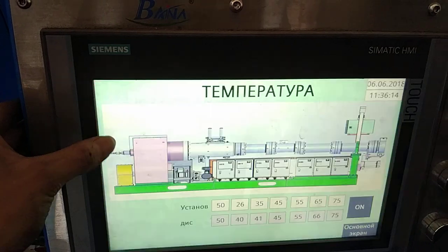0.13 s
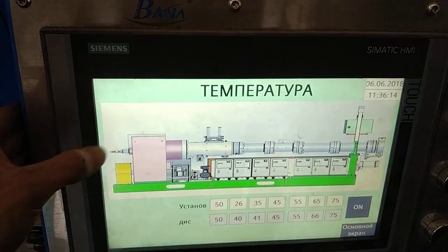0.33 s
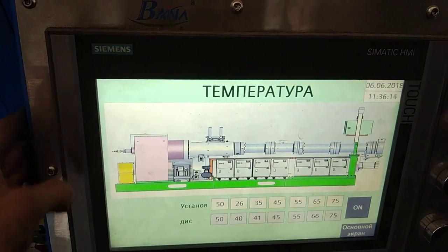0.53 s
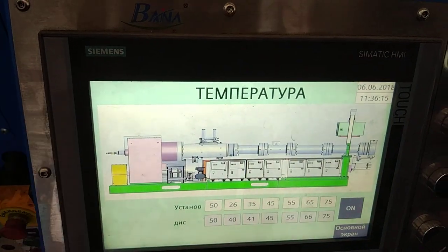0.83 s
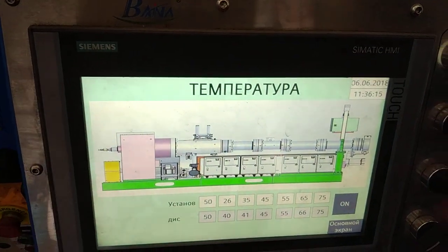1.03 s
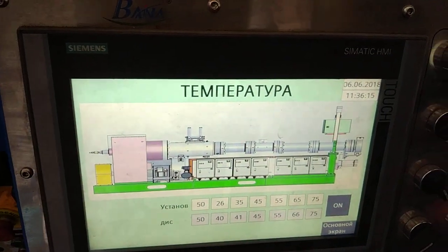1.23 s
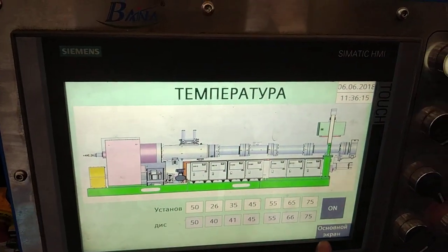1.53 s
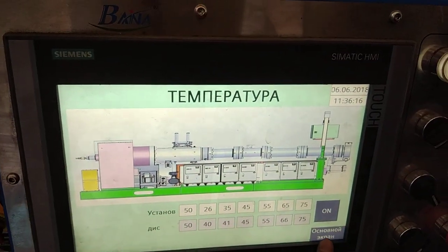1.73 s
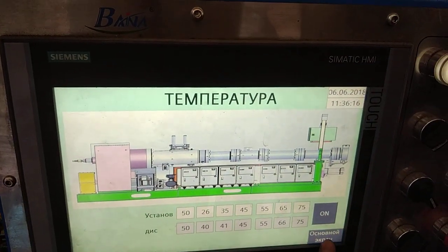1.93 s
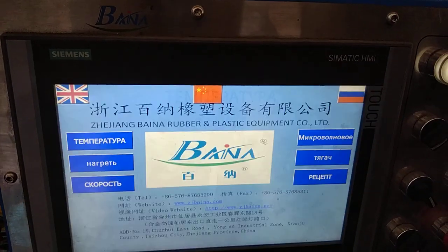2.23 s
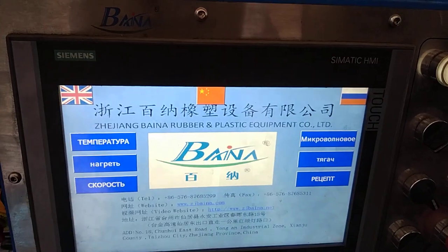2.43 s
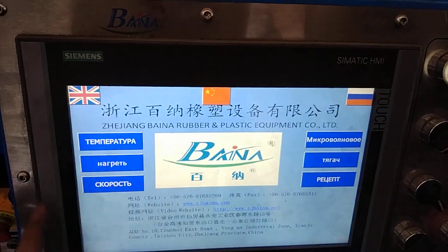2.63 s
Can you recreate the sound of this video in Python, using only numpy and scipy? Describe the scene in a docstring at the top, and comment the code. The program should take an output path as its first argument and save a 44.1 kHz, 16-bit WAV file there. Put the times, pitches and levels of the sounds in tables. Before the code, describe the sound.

Loud factory machinery drone, rushing fans and whining motor, with a few faint rattling clicks nearby

```python
"""A factory hall: fans and blowers rush and rumble, shafts and gears hum, a motor drive whines.
The rush is noise shaped over frequency; hums and gear tones are sines that waver, and two close
fan tones beat. The whine sits at multiples of a switching tone and their sidebands. Near the two
microphones something small rattles four times: bursts of noisy contacts ring a bright body."""
import sys
import numpy as np
from scipy import signal
from scipy.fft import rfft, irfft
from scipy.io import wavfile
from scipy.ndimage import uniform_filter1d

SR = 44100
rng = np.random.default_rng(int(sys.argv[2]) if len(sys.argv) > 2 else 0)


def wav_record(signal):
    """Record a signal, one row per channel, as 16-bit PCM in the file named by sys.argv[1]."""
    frames = np.transpose(np.atleast_2d(signal))
    bounded = np.clip(frames, -1, 1)
    # unit amplitude maps onto the largest positive 16-bit level
    quanta = np.round(bounded * 32767).astype(np.int16)
    wavfile.write(sys.argv[1], SR, quanta)


def natural_amplitude(level_db):
    """Convert a level in decibels to a linear amplitude factor, elementwise."""
    exponent = np.asarray(level_db, float) / 20
    return 10 ** exponent


N = 122598  # samples

# wander of the fan and shaft tones: level in dB rms, phase in rad rms, fastest rate in Hz
HUM_WAVER_DB, HUM_DRIFT_RAD, HUM_WAVER_HZ = 2, 0.6, 4


def evened(x):
    """Scales to rms 1."""
    return x / np.sqrt(np.mean(x ** 2) + 1e-20)


def read(point_hz, value, hz):
    """Joins points by straight lines on a log-frequency axis."""
    return np.interp(np.log(hz + 1), np.log(point_hz + 1), value)


def slow(t, top_hz, count=16):
    """A slow wander of rms 1: sines of random phase up to top_hz, the slower ones stronger."""
    rates = np.geomspace(top_hz / 12, top_hz, count)[:, None]
    sines = np.sin(2 * np.pi * (rates * t + rng.random((count, 1))))
    return evened((sines / np.sqrt(rates)).sum(0))


def rush():
    """Fans and machines as random short-time spectra, with faint patches, a swell and treble flicker."""
    # Spectrum of the rush. Each row: frequency in Hz, left level in dB per Hz, right level in dB per Hz.
    rush_spectrum = [(40, -95, -93.8), (70, -89, -84), (95.5, -75.5, -73), (132.5, -68, -67),
                     (148, -57.5, -59), (194, -44.5, -43.5), (245, -43.5, -42), (285, -48, -46),
                     (303, -44, -43.5), (325, -46.5, -47), (333, -50, -50.5), (474, -49, -46),
                     (530, -46.5, -49.5), (636, -54.5, -53.5), (930, -55, -55.5), (1130, -54.5, -56),
                     (1430, -56.5, -61), (1600, -56.5, -59), (1870, -52.5, -60.5), (2420, -54.5, -60),
                     (3060, -58.5, -63), (3630, -61, -65), (4480, -61, -66.5), (5140, -63.5, -69.5),
                     (6500, -64.5, -69.5), (7360, -66.5, -71.5), (8050, -65.5, -69), (8760, -69, -76.5),
                     (10000, -70.5, -79.5), (10600, -73.5, -95), (11900, -78, -102), (12700, -84.5, -104),
                     (13600, -80, -109), (14200, -82, -100), (14900, -85, -104), (15600, -97, -115)]
    # How alike the microphones hear it. Each row: frequency in Hz, left-right correlation from -1 to 1.
    likeness = [(60, 0.74), (120, 1), (240, 0.94), (480, 0.95), (950, 0.34), (1890, -0.24), (3770, 0.11),
                (7520, -0.061), (15000, -0.31)]
    swell_db, patchy_db, flicker_db, flicker_from_hz = 0.2, 0.8, 1.0, 8000  # depths in dB rms

    count, hz = N // 512 + 5, np.fft.rfftfreq(2048, 1 / SR)
    t = np.arange(count) * 512 / SR
    left_re, left_im, other_re, other_im, patches = rng.standard_normal((count, 1025, 5)).T
    patches = uniform_filter1d(patches, size=20, axis=0)  # across frequency
    patches = evened(uniform_filter1d(patches, size=6, axis=1))  # across time
    treble = (hz ** 2 / (hz ** 2 + flicker_from_hz ** 2))[:, None]
    swell = swell_db * slow(t, 2.73)
    flicker = flicker_db * treble * slow(t, 14)

    same = np.clip(read(*np.transpose(likeness), hz), -1, 1)[:, None]
    left = left_re + 1j * left_im
    right = same * left + np.sqrt(1 - same ** 2) * (other_re + 1j * other_im)
    spectra = np.array([left, right]) * natural_amplitude(patchy_db * patches + swell + flicker)
    # the unshaped noise sets the scale, so that the spectrum reads in dB per Hz
    scale = np.sqrt(SR / 2) / np.std(signal.istft(spectra, nperseg=2048, noverlap=1536)[1])
    point_hz, left_db, right_db = np.transpose(rush_spectrum)
    shape_db = np.array([read(point_hz, left_db, hz), read(point_hz, right_db, hz)])
    spectra *= natural_amplitude(shape_db)[:, :, None]
    return scale * signal.istft(spectra, nperseg=2048, noverlap=1536)[1][:, :N]


def tones(rows, waver_db, drift_rad, waver_hz):
    """Sines of fixed pitch: phase wanders alike at both microphones, level separately at each."""
    # Swell and fade of the high whine, left only. Each row: time in seconds, level change in dB.
    high_whine_left = [(0, -14), (.6, -14), (.7, 2), (1.1, 6), (1.35, 3), (1.5, -8), (2.4, -8), (2.78, -3)]
    swell_from_hz, swell_to_hz = 7700, 8000

    t, coarse, out = np.arange(N) / SR, np.arange(0, N + 256, 256) / SR, np.zeros((2, N))
    for hz, left_db, right_db, *more in rows:
        # if none is given, the left lead is random, in a range that widens up to 1500 Hz
        random_lead = np.clip(hz / 1500, 0, 1) ** 2 * 2 * np.pi * rng.random()
        lead, slope = more or (random_lead, 0)
        left_db = left_db + slope * (coarse - N / SR / 2)
        if swell_from_hz < hz < swell_to_hz:
            left_db = left_db + np.interp(coarse, *np.transpose(high_whine_left))
        drift = np.interp(t, coarse, drift_rad * slow(coarse, waver_hz))
        phase = 2 * np.pi * (hz * t + rng.random()) + drift
        for ear, (db, turn) in enumerate([(left_db, lead), (right_db, 0)]):
            level = natural_amplitude(np.interp(t, coarse, db + waver_db * slow(coarse, waver_hz)))
            out[ear] += np.sqrt(2) * level * np.sin(phase + turn)
    return out


def hums():
    """Fan blades and shafts hum at fixed pitches with a gentle waver."""
    # Tones of blades and shafts. Each row: frequency in Hz, left level in dB rms, right level in dB rms.
    hum_tones = [(285.6, -33, -31.9), (290.7, -39, -39), (301, -40, -38), (313.8, -36, -28),
                 (317.7, -39, -40), (491.0, -39.5, -40), (758.1, -42, -42), (826.4, -52, -40)]
    return tones(hum_tones, HUM_WAVER_DB, HUM_DRIFT_RAD, HUM_WAVER_HZ)


def fan_pair():
    """Two fans at nearly the same speed: close tones sharing one phase wander throb together."""
    # The two fan tones. Each row: frequency in Hz, left level in dB rms, right level in dB rms.
    pair_tones = [(832.37, -42, -39), (835.43, -39, -38)]
    beat_peak_s = 2.1  # the tones are in step here
    t = np.arange(N) / SR
    wander = 2 * np.pi * rng.random() + HUM_DRIFT_RAD * slow(t, HUM_WAVER_HZ)
    out = np.zeros((2, N))
    for hz, *ear_db in pair_tones:
        sine = np.sin(2 * np.pi * hz * (t - beat_peak_s) + wander)
        out += np.sqrt(2) * natural_amplitude(ear_db)[:, None] * sine
    return out


def gears():
    """Gears and bearings sing at many fixed, wavering pitches."""
    # Tones of gears and bearings, before any swell of the high whine.
    # Each row: frequency in Hz, left level in dB rms, right level in dB rms.
    gear_tones = [(2012, -45, -56), (2065.3, -39, -53), (2113.3, -40.5, -52), (2496.1, -41, -53),
                  (2654.2, -45.8, -61.7), (2990.2, -47.0, -63.6), (3025.8, -58.0, -50.9),
                  (3285.9, -49.0, -52.5), (3341.3, -48.8, -46.9), (3396.4, -45.9, -64.0),
                  (3424.6, -41.7, -53.3), (3722.2, -48.4, -59.5), (4245.1, -46.3, -50.4),
                  (4423.4, -48.3, -61.4), (4575.0, -47.3, -53.7), (6078.9, -65.5, -56.2),
                  (7793.7, -51, -56.2), (8312.0, -58.2, -61.5)]
    return tones(gear_tones, waver_db=2, drift_rad=1, waver_hz=2.17)


def drive():
    """Switching tone multiples with sidebands spaced by the motor current frequency."""
    # Where the drive sings. Each row: multiple of the switching tone, multiple of the motor
    # current frequency added to it (both plain numbers).
    orders = [(1, -5), (1, -3), (1, -1), (1, 1), (1, 5), (2, -2), (2, 0), (2, 2), (3, -1), (4, -1), (4, 1),
              (5, 0), (6, -2), (6, 2)]
    # How each order sounds, before any swell of the high whine. Each row: left level in dB rms
    # (at mid-scene), right level in dB rms, left phase lead in rad, left level drift in dB per second.
    whine = [(-50, -44.2, 0, 0), (-43.5, -53, 0, 0), (-33, -52, 2.4, 1.5), (-36.5, -49, .4, 0),
             (-37, -46, 2.8, 1), (-45, -45.5, 2.2, -6), (-48.1, -55.1, 0, 0), (-45, -48.3, -1.6, 2.5),
             (-51.0, -60.9, 0, 0), (-44.6, -49.5, -1.5, -1), (-52, -48.5, 1.6, -4), (-58.0, -76.1, 0, 0),
             (-64.8, -74.3, 0, 0), (-62.8, -72.3, 0, 0)]
    switch_hz, motor_hz = 1999.95, 26.35
    rows = [(m * switch_hz + k * motor_hz, *more) for (m, k), more in zip(orders, whine)]
    return tones(rows, waver_db=2, drift_rad=0.49, waver_hz=1.5)


def rattles():
    """Brief bursts of uneven contacts ring a small bright body, each a little differently, and die away."""
    # The rattles. Each row: start in seconds, level in dB, 60 dB decay time in seconds,
    # boost of modes under 9 kHz in dB, boost of modes over 11.5 kHz in dB.
    rattle_list = [(.96, -27.5, .11, 0, -2), (1.838, -22.5, .08, 4, 0), (1.908, -22.5, .13, -1, -10),
                   (2.166, -21, .12, 2, -3)]
    # Modes of the body. Each row: frequency in Hz, width in Hz, level in dB before boost and scatter.
    body_modes = [(6900, 1000, -2), (8600, 1500, -1), (10300, 1500, 0), (11900, 1000, -6),
                  (13800, 1400, -6), (15200, 800, -12)]
    rise_s, contacts_per_s, contact_db = 0.011, 2500, 15  # contacts stand out of a noise by contact_db
    right_down_db, scatter_db = 10, 2  # right is weaker; each mode varies by up to scatter_db

    t, hz, out = np.arange(8192) / SR, np.fft.rfftfreq(8192, 1 / SR), np.zeros((2, N + 8192))
    for start_s, db, t60, low_db, top_db in rattle_list:
        body = 0
        for mode_hz, width_hz, mode_db in body_modes:
            boost = low_db * (mode_hz < 9000) + top_db * (mode_hz > 11500)
            scatter = scatter_db * rng.uniform(-1, 1)
            resonance = 1 / (1 + 2j * (hz - mode_hz) / width_hz) ** 2
            body = body + natural_amplitude(mode_db + boost + scatter) * resonance
        is_contact = rng.random(8192) < contacts_per_s / SR
        contacts = rng.standard_normal((2, 8192)) * natural_amplitude(contact_db * is_contact)
        ring = irfft(rfft(contacts) * body, 8192)
        rise = np.minimum(t / rise_s, 1) ** 2
        shape = rise * natural_amplitude(db - 60 * np.maximum(t - rise_s, 0) / t60)
        ear_gain = natural_amplitude(np.array([[0], [-right_down_db]]))
        at = round(start_s * SR)
        out[:, at:at + 8192] += np.sqrt(np.mean(shape ** 2)) * ear_gain * evened(shape * ring)
    return out[:, :N]


def scene():
    """The hall as heard at the left and right microphones."""
    return rush() + hums() + fan_pair() + gears() + drive() + rattles()


def low_pass(x):
    """Removes everything above the highest recorded frequency."""
    return signal.sosfilt(signal.butter(12, 15770, fs=SR, output="sos"), x)


def record(dry):
    """The finished two-channel mix, as it is delivered."""
    return low_pass(dry)


dry = scene()
out = record(dry)
wav_record(out)
```